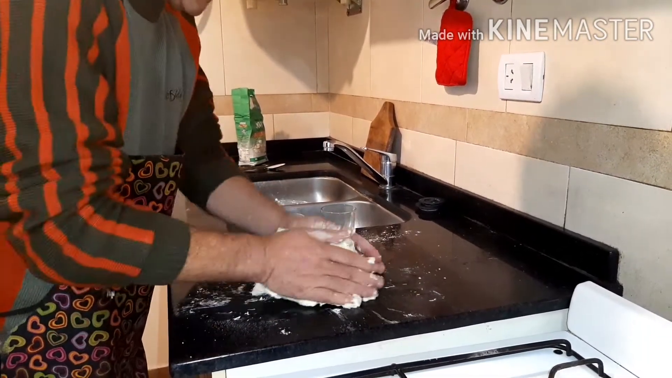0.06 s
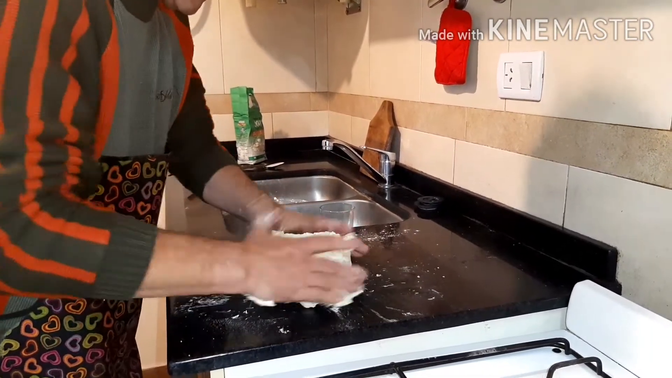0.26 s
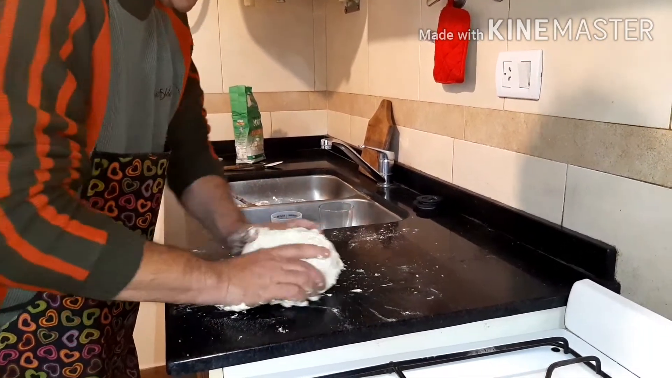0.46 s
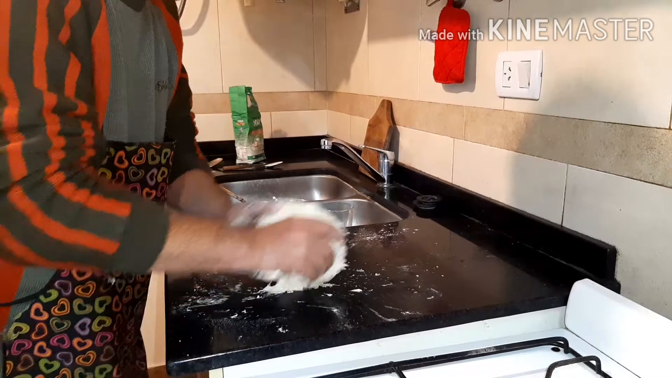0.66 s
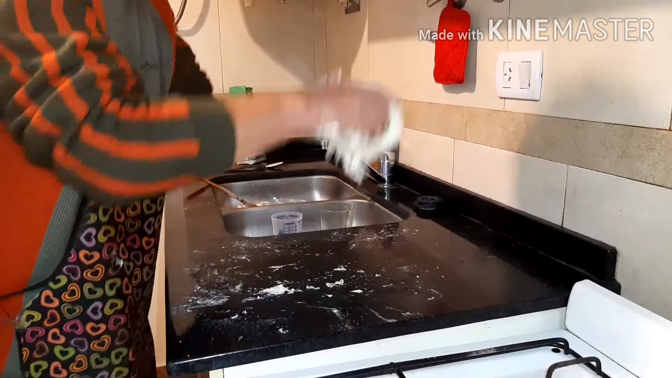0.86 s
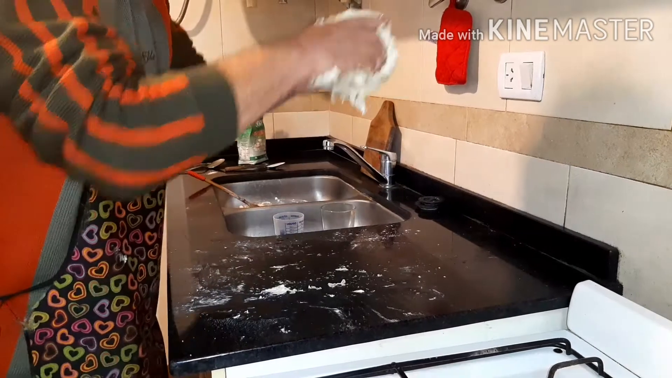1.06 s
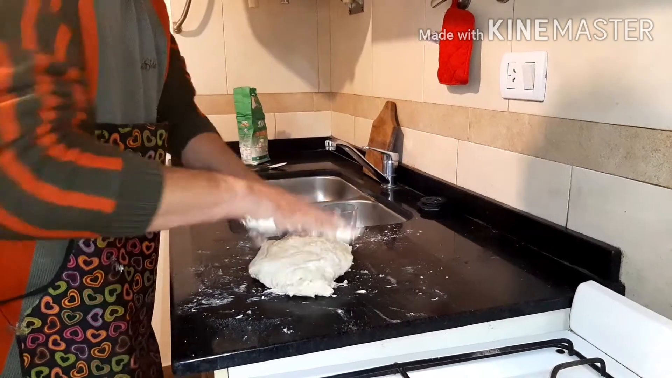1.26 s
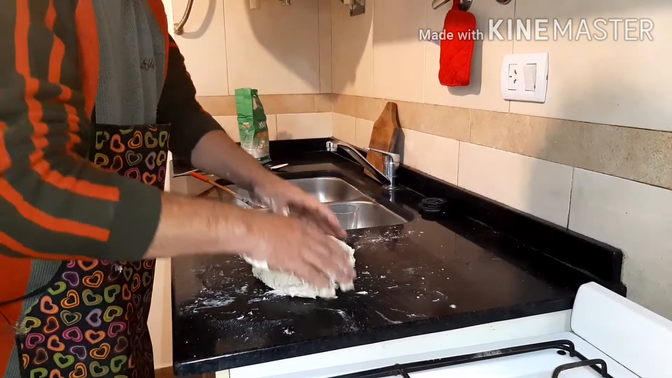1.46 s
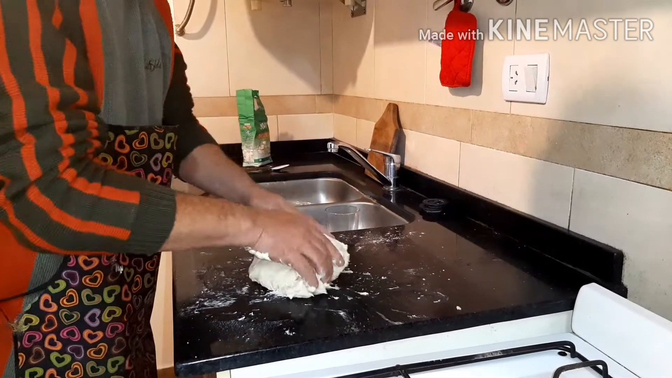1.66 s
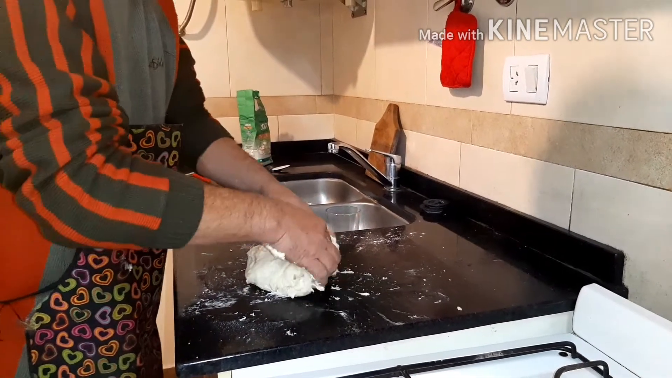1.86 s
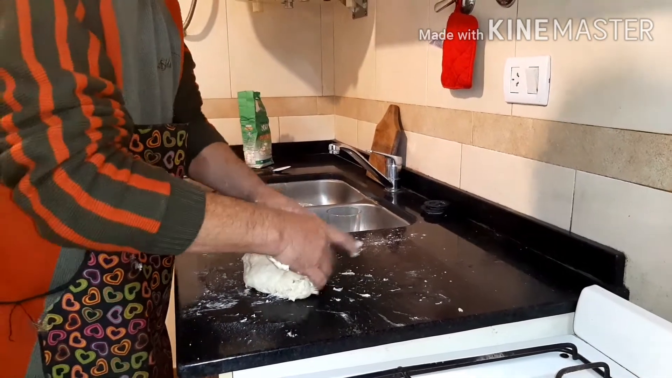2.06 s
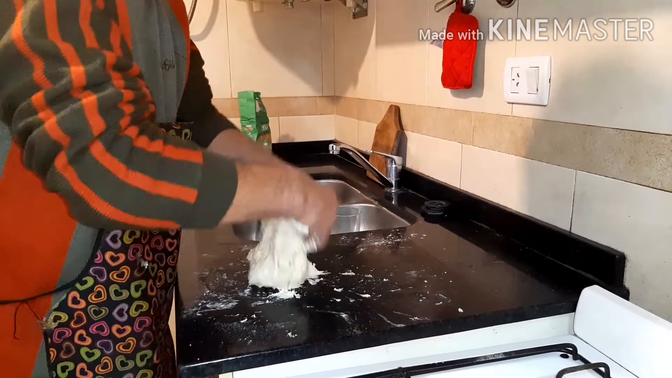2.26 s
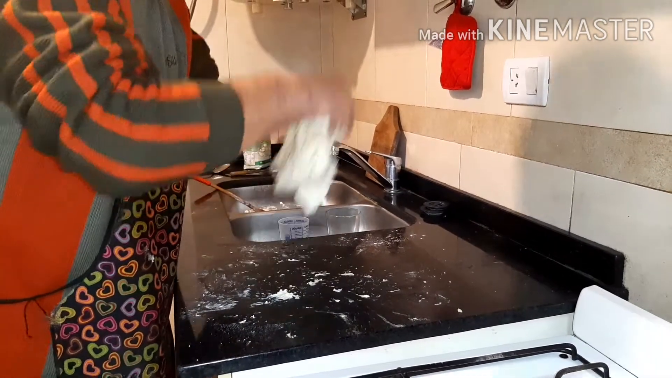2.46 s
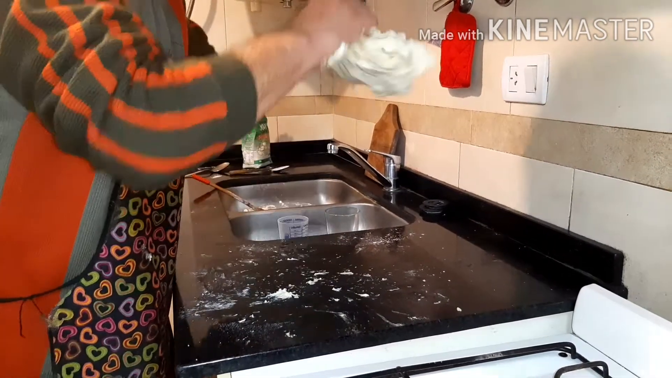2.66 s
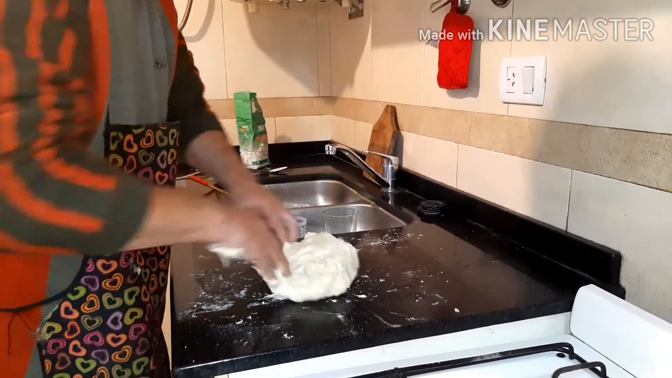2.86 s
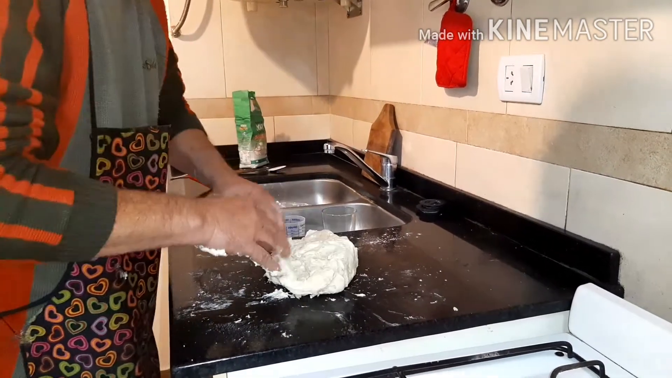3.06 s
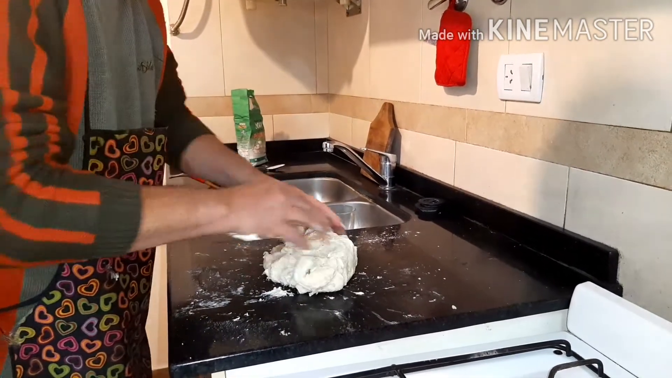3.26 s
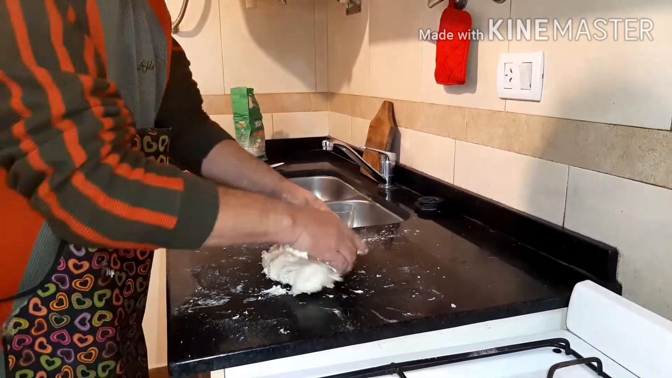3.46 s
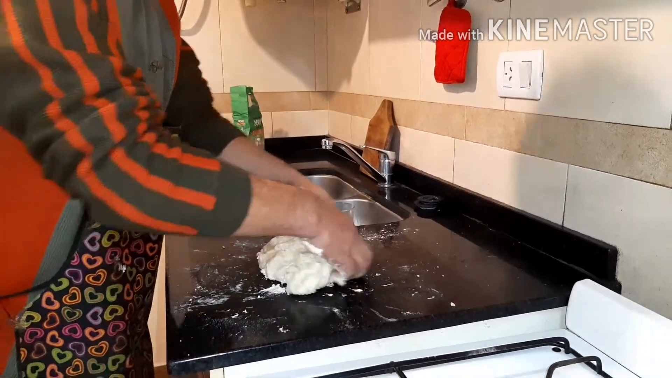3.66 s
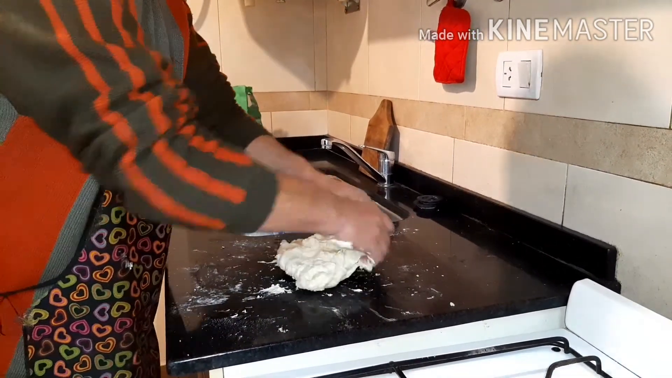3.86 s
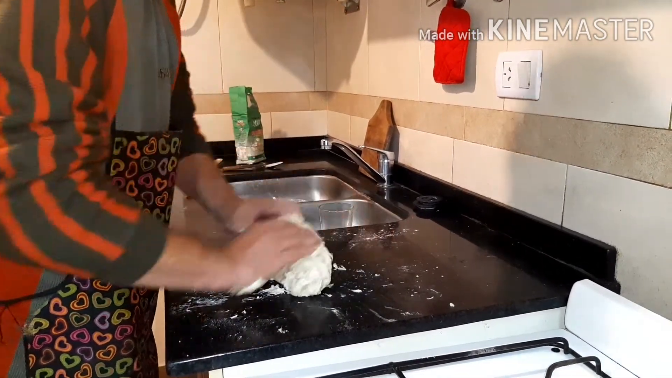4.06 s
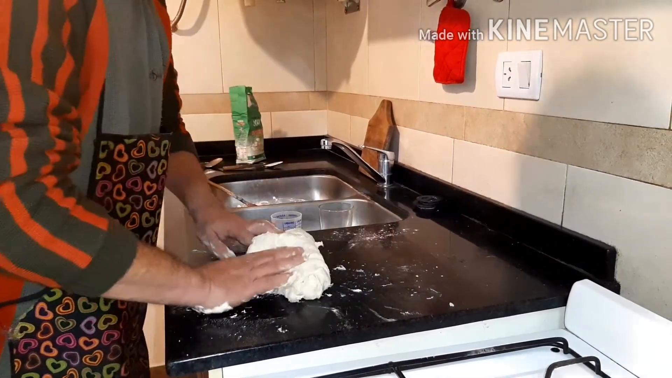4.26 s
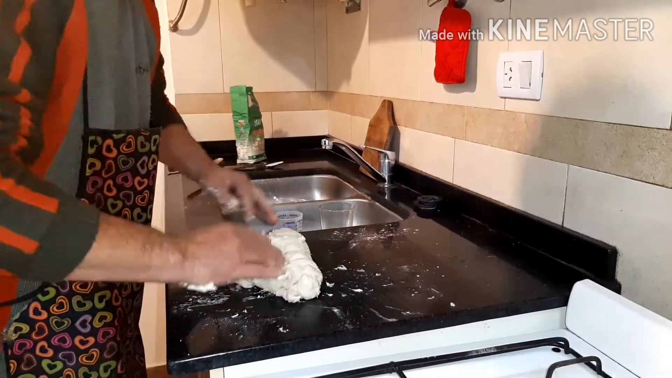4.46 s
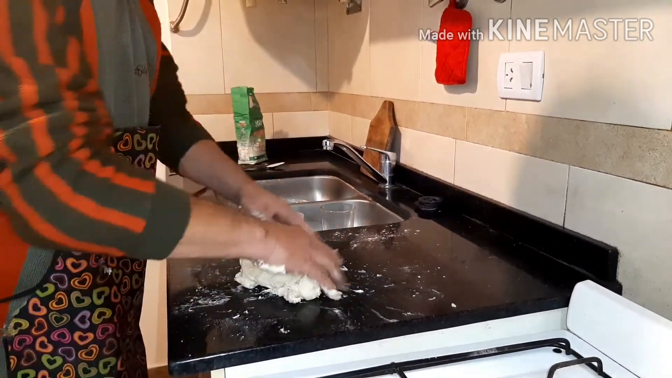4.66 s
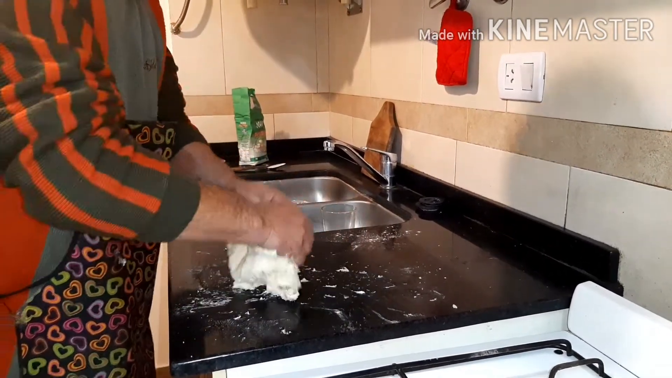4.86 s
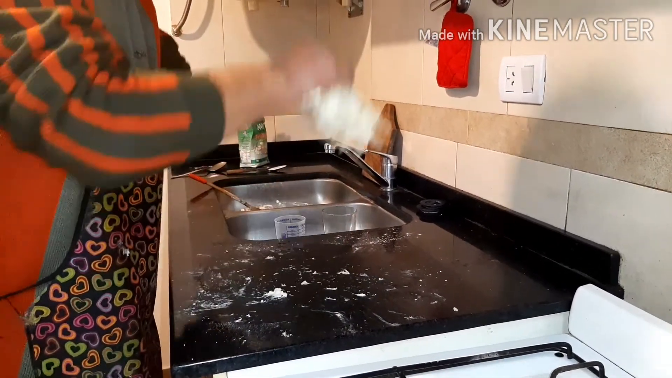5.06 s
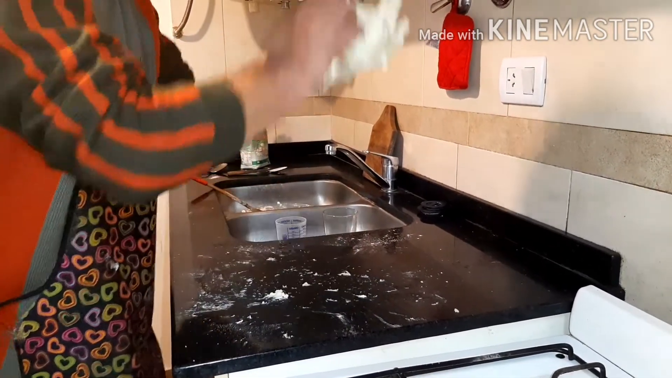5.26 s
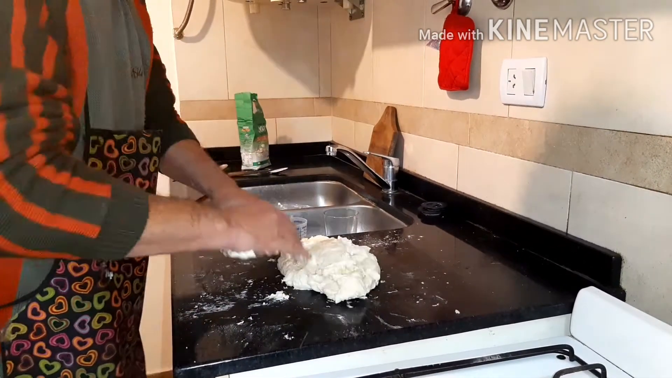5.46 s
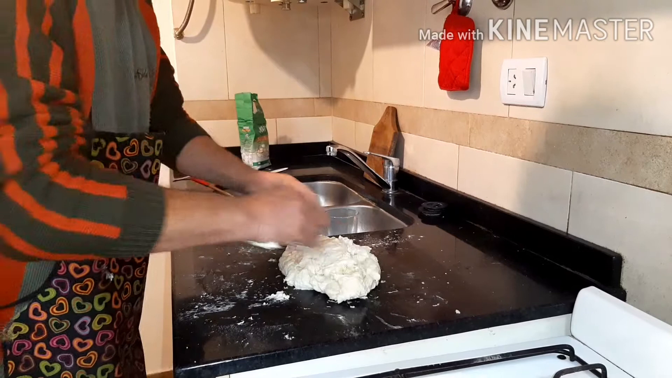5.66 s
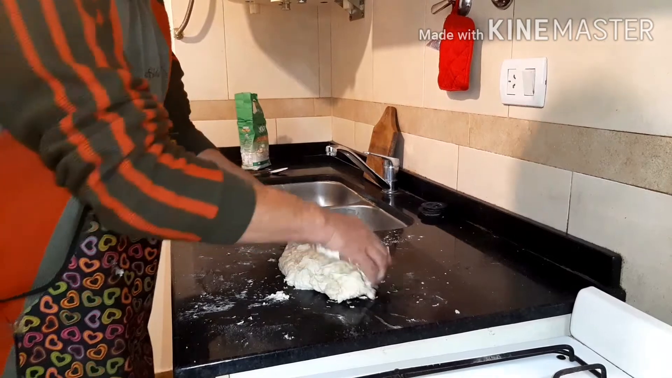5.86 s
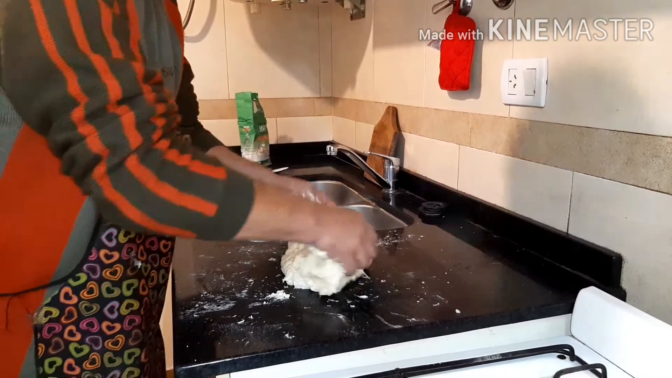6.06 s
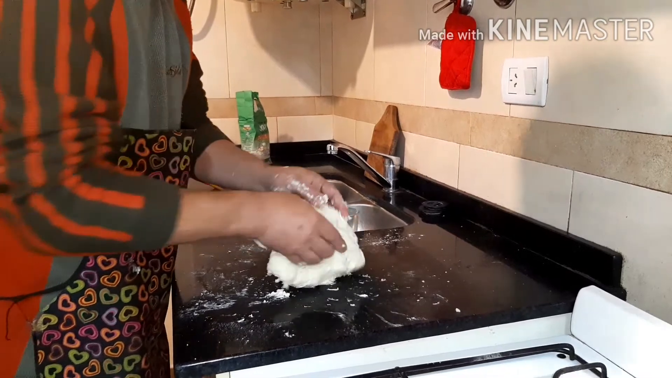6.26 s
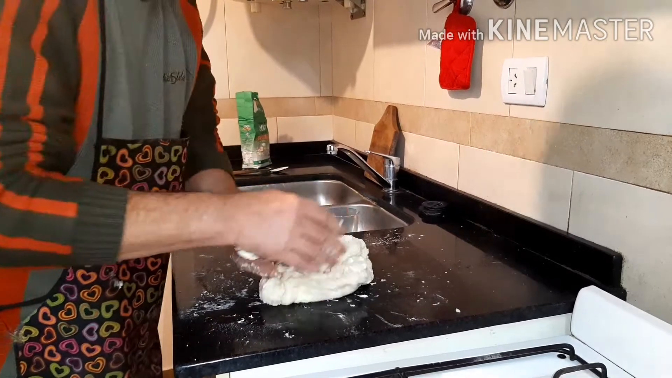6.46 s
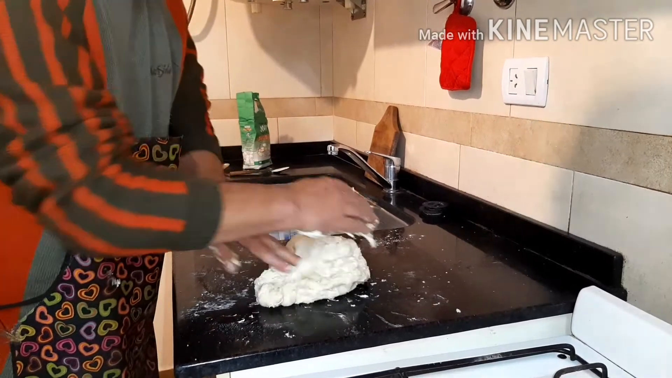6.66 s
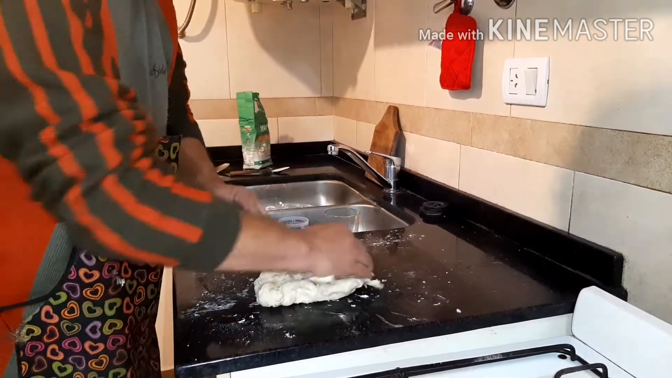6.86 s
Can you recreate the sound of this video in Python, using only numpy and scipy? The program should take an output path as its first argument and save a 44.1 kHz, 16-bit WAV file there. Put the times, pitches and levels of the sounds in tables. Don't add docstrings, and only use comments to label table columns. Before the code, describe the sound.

Soft wet dough is thrown onto a stone kitchen counter three times with loud smacking thuds, then pushed and kneaded with quieter knocks.

```python
import sys
import numpy as np
from scipy import signal
from scipy.fft import rfft, irfft
from scipy.io import wavfile
from scipy.ndimage import uniform_filter1d

SR = 44100
rng = np.random.default_rng(int(sys.argv[2]) if len(sys.argv) > 2 else 0)


def decibels_to_gain(level_db):
    exponent = np.asarray(level_db, float) / 20
    return 10 ** exponent


def materialize(psi):
    bounded = np.clip(np.atleast_2d(psi).T, -1, 1)
    quanta = np.round(bounded * 32767).astype(np.int16)
    wavfile.write(sys.argv[1], SR, quanta)


N = 305657


def on_log(table, hz):
    f, v = np.transpose(table)
    return np.interp(np.log(np.maximum(hz, 1)), np.log(f), v)


def curve(table):
    s, *columns = np.transpose(table)
    return [np.interp(np.arange(N) / SR, s, c) for c in columns]


def level(x, db):
    return x * decibels_to_gain(db) / np.sqrt(np.mean(x ** 2))


def add(track, s, piece):
    i = int(s * SR)
    track[i:i + len(piece)] += piece[:len(track) - i]


def walk(rate_hz):
    k = int(SR / rate_hz)
    steps = np.repeat(rng.standard_normal(N // k + 1), k)
    return 1.3 * uniform_filter1d(uniform_filter1d(steps, k), k)[:N]


MIC_GAP_M, MIC_ALIKE = 0.14, 0.85


def diffuse(size, gain):
    hz = np.fft.rfftfreq(size, 1 / SR)
    alike = MIC_ALIKE * np.sinc(2 * hz * MIC_GAP_M / 343)
    mid, side = rfft(rng.standard_normal((2, size))) * gain(hz)
    mid = mid * np.sqrt(1 + alike)
    side = side * np.sqrt(1 - alike)
    return irfft(np.array([mid + side, mid - side]), size)


# (time [s], peak [dB], pocket [Hz], pocket over hiss [dB], fade [ms])
SMACKS = [(1.221, -15.5, 7160, -10, 7.9), (1.223, -12, 2380, -2.5, 1.65), (1.2253, -22, 714, 5, 4.2),
          (2.092, -57, 2070, -11, 1.6), (2.8604, -9, 2250, 0.5, 1.1), (4.6837, -37, 5600, -8, 2.5),
          (5.3908, -8, 2290, -7, 1.3), (5.395, -19, 4000, 6, 0.9), (5.4088, -20, 2060, -8, 1.1),
          (5.424, -21, 1860, 5.5, 10.6), (5.871, -49.5, 4080, -11, 1.8)]
# (frequency [Hz], density [dB per Hz])
SMACK_COLOUR = [(530, -22), (900, -3.5), (1630, -4.5), (2360, -3.5), (4770, -9), (6900, -11), (8250, -13.5),
                (8960, -12.5), (15500, -13)]
SMACK_RISE_MS = 0.6
TREBLE_DB, TREBLE_DB_PER_OCTAVE = -12, 2.5


def smacks():
    burst, click = np.zeros(N), np.zeros((3, N))
    t_ms = np.arange(2048) / SR * 1000
    hz = np.fft.rfftfreq(2048, 1 / SR)
    swell = np.exp(t_ms / SMACK_RISE_MS - 3)
    for k, (s, peak_db, pocket_hz, pocket_db, fade_ms) in enumerate(SMACKS):
        start_s = s - SMACK_RISE_MS / 1000
        treble_db = TREBLE_DB + TREBLE_DB_PER_OCTAVE * np.log2(pocket_hz / 2000)
        tilt_db = (treble_db + 10) * np.clip(np.log2(hz / 4000 + 1e-9), 0, 1)
        colour = decibels_to_gain(on_log(SMACK_COLOUR, hz) + tilt_db)
        hiss = level(irfft(rfft(rng.standard_normal(2048)) * colour), 0)
        ring = decibels_to_gain(pocket_db + 3) * np.sin(2 * np.pi * pocket_hz * t_ms / 1000)
        envelope = np.minimum(swell, np.exp((3 * SMACK_RISE_MS - t_ms) / fade_ms))
        piece = decibels_to_gain(peak_db - 5) * (hiss + ring) * envelope
        add(burst, start_s, piece)
        colour *= 1 + decibels_to_gain(pocket_db + 4) / (1 + ((hz / pocket_hz - 1) / 0.16) ** 2)
        puff = irfft(colour * np.exp(1j * np.angle(rfft(piece))))
        puff = np.roll(puff, 128)[:1024]
        puff *= np.sqrt(np.sum(piece ** 2) / np.sum(puff ** 2))
        add(click[k % len(click)], start_s - 128 / SR, puff)
    return burst, click


# (frequency [Hz], level [dB], t60 [s])
COUNTER_MODES = [(72, -3.5, 0.083), (87.7, 2.5, 0.21), (92, -4.5, 0.48), (108.6, 0.5, 0.17), (132, -3, .16),
                 (164.2, 0.5, 0.13), (236.5, -4, 0.11), (290, -2, .14), (348.3, -0.5, 0.099),
                 (385.5, -8, .16), (433, -1.5, 0.074), (554, 4, 0.027), (661.3, -3.5, 0.097),
                 (795, 3.5, 0.019), (920, -13, 0.023), (1200, 2.5, 0.033)]
# (time [s], peak [dB], region [octaves over 90 Hz], fall above [dB per octave])
LANDINGS = [
    (1.224, -15.5, 0, 1.6),
    (1.24, -15, 0.46, 6),
    (1.305, -18, 0.55, 17),
    (1.399, -39, 0, 16),
    (2.861, -7.5, 0.97, 6.5),
    (2.877, -7, 0.55, 8.5),
    (5.394, -15.5, 0.92, 2),
    (5.402, -20.5, 2.05, 4.5),
    (5.41, -13, 1.34, 5),
    (5.43, -13, 0.99, 2),
]
KNOCKS = [(.35, -45, 1.1, 10), (.394, -29, 1, 16), (.442, -44, 0.4, 10.5), (.482, -53, 2.1, 5),
          (.918, -53.5, 0, 6.5), (2.003, -39, 0.78, 24), (3.356, -25, 1.12, 17.5),
          (3.376, -31.5, 0.29, 5.5), (3.417, -33.5, 0.54, 8.5), (3.454, -40, 0.69, 10),
          (3.688, -44.5, 1.4, 2), (3.705, -44.5, 1.54, 11), (4.672, -28, 1, 13), (4.687, -22, 1.05, 17.5),
          (4.721, -34, 1, 8.5), (4.772, -38, 0.46, 6), (4.891, -53, 0.29, 4), (5.132, -44, 0.098, 9.5),
          (5.758, -32.5, 1, 11.5), (5.799, -32.5, 0.44, 16), (5.848, -34, 0.81, 10.5), (6.22, -54, 0, 5)]
BELOW_DB_PER_OCTAVE = 14


def counter(knead_db):
    pushes = list(LANDINGS) + list(KNOCKS)
    out = np.zeros(N)
    place = rng.standard_normal((len(pushes), len(COUNTER_MODES)))
    rolling = decibels_to_gain(knead_db - 36 + 2 * walk(14)) * rng.standard_normal(N)
    t = np.arange(200) / SR
    for k, (hz, db, t60_s) in enumerate(COUNTER_MODES):
        force = rolling * min(300 / hz, 1)
        shape = np.hanning(len(t)) * np.cos(2 * np.pi * hz * (t - t.mean()))
        shape /= np.abs(shape @ np.exp(-2j * np.pi * hz * t))
        for (s, peak_db, region, fall_db), luck in zip(pushes, place[:, k]):
            off = np.clip(np.log2(hz / 90), 0, 3.4) - region
            reach_db = peak_db - fall_db * max(off, 0) + BELOW_DB_PER_OCTAVE * min(off, 0)
            add(force, s - t.mean() / 2, decibels_to_gain(reach_db + 5.1 * luck - 3.5) * shape)
        pole = np.exp(2j * np.pi * hz / SR - np.log(1000) / (t60_s * SR))
        out += (-1) ** k * decibels_to_gain(db) * signal.lfilter([1], [1, -pole], force).imag
    return out


THROWS_S = [
    1.221,
    2.861,
    5.391,
]
# (time [s], effort [dB])
EFFORT = [(0, -49.5), (.3, -53), (.48, -53.5), (.6, -59), (.76, -49.5), (1.03, -56.5), (1.7, -56),
          (2.01, -52.5), (2.3, -58.5), (2.84, -53), (3.4, -62), (3.77, -58.5), (3.96, -63), (4.67, -51.5),
          (5.11, -59.5), (5.9, -58), (6.46, -64), (6.85, -54.5)]
SETTLE_DB, SETTLE_DB_PER_S = -27, 64
SCRAPE_DB, SCRAPE_SLOPE = -67.5, 1.2


def kneading():
    t = np.arange(N) / SR
    effort_db, = curve(EFFORT)
    settle = sum((t > s) * decibels_to_gain(SETTLE_DB - SETTLE_DB_PER_S * np.abs(t - s)) ** 2 for s in THROWS_S)
    knead_db = 10 * np.log10(decibels_to_gain(effort_db) ** 2 + settle)
    return knead_db, SCRAPE_DB + SCRAPE_SLOPE * (effort_db + 56)


# (middle [s], peak [dB], half length [s])
BRUSHES = [(0.13, -63.5, 0.15), (0.49, -67.5, 0.13), (0.727, -56, 0.055), (0.97, -70, 0.22),
           (1.703, -69.5, 0.12), (1.945, -67.5, 0.046), (2.046, -71.5, 0.14), (2.304, -68.5, 0.11),
           (2.52, -69, 0.13), (2.716, -68, .05), (3.125, -63, 0.029), (3.506, -68.5, 0.078),
           (3.67, -74, 0.051), (4.038, -76, 0.074), (4.327, -68, 0.0055), (4.42, -70.5, .08),
           (4.672, -64, .03), (4.833, -65.5, 0.15), (5.255, -74.5, 0.13), (5.863, -79, 0.02),
           (6.104, -72, 0.1), (6.291, -78, 0.14), (6.73, -72.5, .08), (6.93, -75, .025)]
BRUSH_EDGE_DB, CLOTH_FLOOR_DB = 9.5, -79.5
WHOOSH_DB, WHOOSH_S = -51.5, 0.025


def brushing():
    t = np.arange(N) / SR
    brush = sum(decibels_to_gain(db - BRUSH_EDGE_DB * np.abs((t - s) / half_s) ** 3) ** 2 for s, db, half_s in BRUSHES)
    whoosh = sum((t < s) * decibels_to_gain(WHOOSH_DB - 10 * np.abs(t - s) / WHOOSH_S) ** 2 for s in THROWS_S)
    return 10 * np.log10(brush + whoosh + decibels_to_gain(CLOTH_FLOOR_DB) ** 2)


# (frequency [Hz], density [dB per Hz])
RUSTLE_COLOUR = [(2500, -14.5), (4000, -10), (6500, -9), (8500, -12.5), (10500, -8.5), (15500, -8.5)]


def rustle(scrape_db, cloth_db):
    scrape = diffuse(N, lambda f: 1 / (1 + ((f - 2050) / 420) ** 2))
    cloth = diffuse(N, lambda f: decibels_to_gain(on_log(RUSTLE_COLOUR, f)) / (1 + (2600 / (f + 1)) ** 4))
    scrape = level(scrape, -6.0) * decibels_to_gain(scrape_db + 0.4 * walk(8.4))
    cloth = level(cloth, 0.9) * decibels_to_gain(cloth_db + 1.2 * walk(34))
    return scrape + cloth


# (time [s], length [s], frequency [Hz], level [dB], roughness [rad per sample])
SQUEAKS = [
    (0.093, 0.074, 1880, -60, 0.055),
    (0.852, 0.22, 1207, -75, 0.043),
    (1.498, 0.19, 290, -55, 0.035),
    (2.241, 0.55, 1265, -73.5, 0.052),
    (6.152, 1, 222, -69.5, 0.049),
    (6.741, 0.063, 1934, -63.5, 0.1),
]


def squeaks():
    out = np.zeros(N)
    for s, length_s, hz, db, rough in SQUEAKS:
        size = min(int(length_s * SR), SR)
        wobble = np.cumsum(rough * rng.standard_normal(size))
        tone = np.sin(2 * np.pi * hz * np.arange(size) / SR + wobble)
        add(out, s, decibels_to_gain(db + 3) * np.hanning(size) * tone)
    return out


# (frequency [Hz], t60 [s])
ROOM_T60 = [(60, 0.89), (125, 0.68), (300, 0.44), (1000, 0.48), (3000, 0.46), (7000, 0.35), (14000, 0.18)]
# (frequency [Hz], level [dB])
ROOM_COLOUR = [(50, -6.5), (150, -4), (500, 4), (1500, -2.5), (4000, -2), (9000, 0), (16000, 4.5)]


def room():
    t, tail = np.arange(SR) / SR, 0.0
    for hz in 45 * 2 ** np.arange(0, 8.6, 0.5):
        band = diffuse(SR, lambda f: np.cos(np.pi * np.clip(np.log2(f / hz + 1e-9), -0.5, 0.5)) ** 2)
        build = 1 - np.exp(-(t / (0.00061 + 6.9 / hz)) ** 2)
        decay = decibels_to_gain(on_log(ROOM_COLOUR, hz) - 60 * t / on_log(ROOM_T60, hz))
        tail = tail + band * build * decay
    return tail / np.sqrt(SR / 10)


# (frequency [Hz], density [dB per Hz])
AIR = [(18, -38), (30, -13.5), (81, -11), (350, -16.5), (575, -21.5), (830, -24.5), (1550, -30),
       (2070, -24), (3490, -39), (5170, -37), (5740, -51.5), (6540, -35), (8720, -49.5), (15500, -46.5)]
AIR_DB = -61.5
# (time [s], murmur [dB], low drone [dB])
AIR_SWELL = [(0, -66, -60), (.7, -68.5, -60), (1.05, -62, -72.5), (1.8, -72.5, -71.5), (2.6, -68, -65.5),
             (3.4, -64, -63), (3.8, -70.5, -59), (4.8, -63.5, -51), (5.3, -60.5, -52.5), (6.2, -72.5, -60),
             (6.93, -78.5, -59)]
# (frequency [Hz], width [Hz], level [dB])
DRONE = [(66, 5, 1), (122, 12, -9.5)]
# (frequency [Hz], rms level [dB])
WHINE = [(1389, -84.5), (2083, -81), (6395, -84), (6546, -90.5)]


def air():
    murmur_db, drone_db = curve(AIR_SWELL)
    murmur = 0
    for hz in 32 * 2 ** np.arange(10.0):
        def band_gain(f):
            octaves = np.clip(np.log2(f / hz + 1e-9), -1, 1)
            return decibels_to_gain(on_log(AIR, f)) * np.cos(np.pi / 2 * octaves)
        swell_db = min(hz / 400, 1) * (murmur_db - murmur_db.mean())
        murmur = murmur + diffuse(N, band_gain) * decibels_to_gain(0.9 * walk(1.5) + swell_db)
    drone = diffuse(N, lambda f: sum(decibels_to_gain(db) / (1 + ((f - hz) / width) ** 2) for hz, width, db in DRONE))
    drone = level(drone, -2.0) * decibels_to_gain(drone_db + 1.5 * walk(3.5))
    t, tones = np.arange(N) / SR, 0
    for hz, db in WHINE:
        phase = np.array([[0], [2]]) + 0.96 * walk(1.2)
        tones = tones + decibels_to_gain(db + 3.5 + 0.69 * walk(0.95)) * np.sin(2 * np.pi * hz * t + phase)
    return level(murmur, AIR_DB) + drone + tones


LEFT_LATE_MS = 0.17


def scene():
    knead_db, scrape_db = kneading()
    thud = counter(knead_db)
    burst, click = smacks()
    direct = decibels_to_gain(-3.5) * thud + burst + squeaks()
    direct = np.array([np.roll(direct, int(LEFT_LATE_MS * SR / 1000)), direct])
    wet = 0
    for spot in click:
        source = decibels_to_gain(-6.0) * thud + decibels_to_gain(6.5) * spot
        wet = wet + signal.fftconvolve(source[None], room(), axes=1)[:, :N]
    return direct + wet + rustle(scrape_db, brushing()) + air()


def roll_off(x):
    return signal.sosfilt(signal.butter(12, 16620, fs=SR, output="sos"), x)


LEFT_LOUDER_DB, TOP_HZ = 3, 15750


def record(dry):
    cuts = [signal.butter(3, hz, "high", fs=SR) for hz in (44, 56)]
    x = np.array([signal.lfilter(*cut, side) for cut, side in zip(cuts, dry)])
    x = x * decibels_to_gain([[LEFT_LOUDER_DB / 2], [-LEFT_LOUDER_DB / 2]])
    rounded = np.tanh(x * 1.007) / 0.64
    top_cut = signal.ellip(8, 0.3, 50, TOP_HZ, fs=SR, output="sos")
    mix = signal.sosfilt(top_cut, rounded)
    return roll_off(mix)


dry = scene()
out = record(dry)
materialize(out)
```